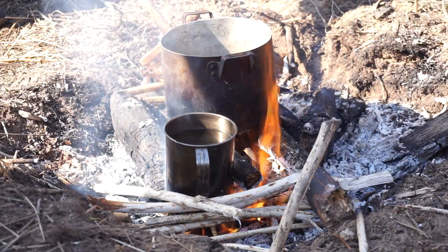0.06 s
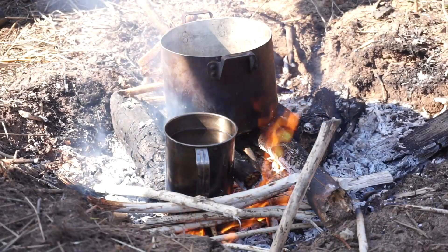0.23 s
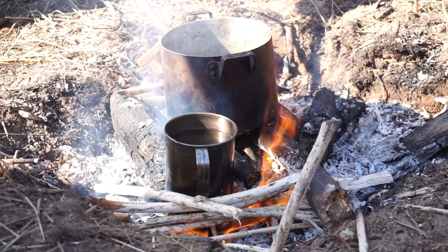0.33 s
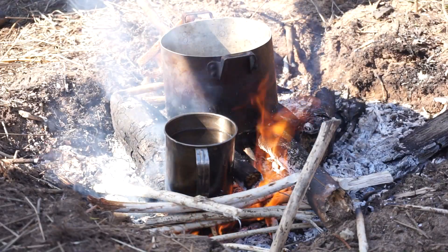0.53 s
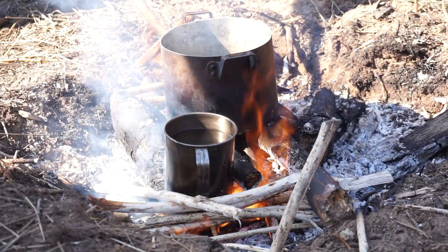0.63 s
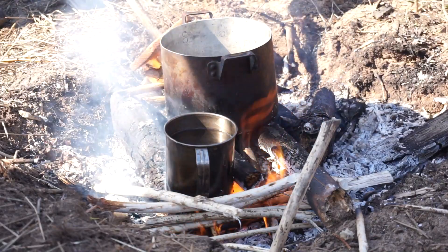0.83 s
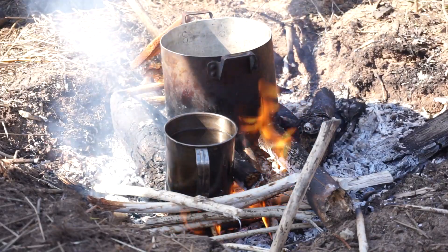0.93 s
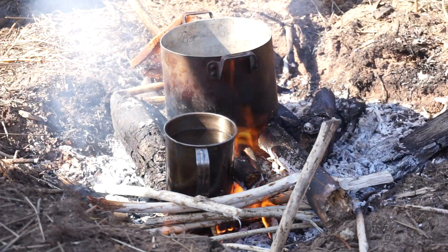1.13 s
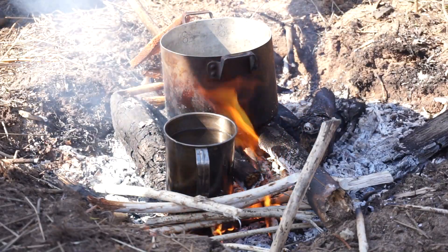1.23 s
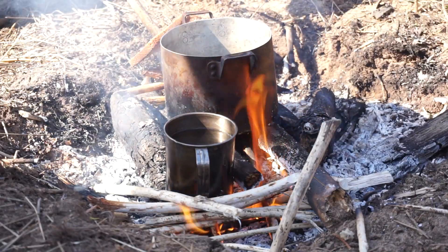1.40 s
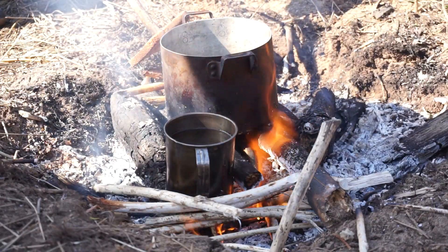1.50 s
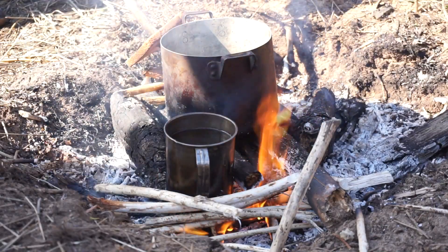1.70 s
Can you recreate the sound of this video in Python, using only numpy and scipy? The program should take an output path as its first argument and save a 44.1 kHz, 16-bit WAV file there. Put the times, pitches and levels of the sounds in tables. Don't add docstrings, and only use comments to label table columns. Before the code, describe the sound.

A wood fire snaps and crackles at arm's length, with hissing sap and faint distant water

```python
import sys
import numpy as np
from scipy import signal
from scipy.io import wavfile
from scipy.ndimage import uniform_filter1d

SR = 44100
rng = np.random.default_rng(int(sys.argv[2]) if len(sys.argv) > 2 else 0)


def convert_level_to_amplitude(level_db):
    exponent = np.asarray(level_db, float) / 20
    return 10 ** exponent


def pcm_store(signal):
    levels = np.round(np.clip(np.atleast_2d(signal), -1, 1) * 32767)
    wavfile.write(sys.argv[1], SR, levels.astype(np.int16).T)


N = 77175


def band(x, hz, width_hz):
    return signal.lfilter(*signal.iirpeak(min(hz, 0.45 * SR), hz / width_hz, fs=SR), x)


def unit(x):
    return x / np.sqrt(np.mean(x ** 2))


def walk(rate):
    hold = int(SR / rate)
    steps = np.repeat(rng.standard_normal(N // hold + 1), hold)
    smooth = uniform_filter1d(uniform_filter1d(steps, hold), hold)
    return 1.37 * smooth[:N]


def on_log(table, hz):
    table_hz, table_db = np.array(table).T
    return np.interp(np.log(hz), np.log(table_hz), table_db)


def pan(db):
    return convert_level_to_amplitude(np.array([[db / 2], [-db / 2]]))


def add(out, x, s):
    i = int(s * SR)
    out[:, i:i + x.shape[1]] += x[:, :N - i]


# frequency in Hz, side minus mid in dB.
STEREO_SPREAD = [(60, -3), (110, -13), (200, -8.5), (380, -1), (700, -0.5), (1290, 5), (2380, 1.5),
                 (4400, 0.5), (8120, -1), (15000, -7)]


def wide(hz, width_hz):
    noise = rng.standard_normal((2, N))
    mid, side = band(band(noise, hz, width_hz), hz, 1.62 * width_hz)
    return unit(mid) + convert_level_to_amplitude(on_log(STEREO_SPREAD, hz)) * unit(side) * np.array([[1], [-1]])


# frequency in Hz, level in dB per Hz.
RIVER_COLOUR = [(25, -22), (60, -16.5), (130, -10.5), (400, -8.5), (700, -6.5), (1130, -10), (2000, -8.5),
                (14000, -10)]


def river():
    out = 0
    for hz in 28 * 2 ** np.arange(0, 9.3, 1 / 3):
        flicker_db = 4.5 if hz < 250 else 1.2
        band_db = on_log(RIVER_COLOUR, hz) + 10 * np.log10(hz)
        out = out + convert_level_to_amplitude(band_db + flicker_db * walk(9.03)) * wide(hz, hz / 3)
    return convert_level_to_amplitude(-56.5) * unit(out)


# pitch in Hz, width in Hz, level in dB.
AIR_RESONANCES = [(628, 65, -72), (706.5, 41, -79), (180, 51, -82.5)]


def pot():
    out = 0
    for hz, width_hz, db in AIR_RESONANCES:
        out = out + convert_level_to_amplitude(db + 1.55 * walk(7.52)) * wide(hz, width_hz)
    return out


# start in seconds, level in dB, pitch in Hz.
FLAME_PUFFS = [
    (0.131, -62.5, 108),
    (0.242, -60.5, 95),
    (0.318, -58.5, 110),
    (0.724, -59.5, 177),
    (.87, -55, 180),
    (1.24, -62.5, 174),
    (1.332, -60.5, 88),
    (1.42, -61.5, 89),
]


def flame():
    rise_s, cycles = 0.0076, 1.75
    out = np.zeros((2, N))
    t = np.arange(8192) / SR
    for s, db, hz in FLAME_PUFFS:
        shape = (1 - np.exp(-t / rise_s)) * np.exp(-t * hz / cycles)
        swing = np.sin(2 * np.pi * hz * t * (1 - 1.18 * t))
        add(out, convert_level_to_amplitude(db + 3.5) * pan(0) * shape * swing, s - rise_s)
    return out


# time in seconds, pitch in Hz, level in dB.
STEAM_JETS = [
    [(.2, 2158, -83), (.225, 2174, -65.5), (.285, 2073, -68), (.34, 2174, -66), (.40, 2190, -69),
     (.48, 2223, -68.5), (.53, 2200, -67)],
    [(.93, 1930, -91), (.96, 1918, -66), (1.03, 1923, -72.5), (1.085, 1928, -60), (1.11, 1930, -93),
     (1.15, 1932, -62.5), (1.22, 1840, -73), (1.45, 1964, -82), (1.5, 1940, -106)],
]


def whistles(t):
    pitch_wobble, left_lag_s = 0.0039, 0.00021
    out = 0
    for jet in STEAM_JETS:
        s, hz, db = np.array(jet).T
        pitch = np.interp(t, s, hz) * (1 + pitch_wobble * walk(58.9))
        phase = 2 * np.pi * np.cumsum(pitch) / SR
        level_db = np.interp(t, s, db, left=-140, right=-140) + 4.5 + 3.6 * walk(39.1)
        out = out + np.sin(phase) * convert_level_to_amplitude(level_db)
    return np.array([np.roll(out, int(left_lag_s * SR)), out]) * pan(-12.5)


# time in seconds, level in dB.
SAP_LEVEL = [
    (0.0, -64),
    (0.292, -57.5),
    (0.52, -56),
    (0.988, -63),
    (1.272, -67),
    (1.462, -58),
    (1.75, -56.5),
]
# centre in Hz, width in Hz, level in dB.
SAP_BANDS = [(4700, 2200, -9), (8520, 4100, -3.5), (11540, 4900, 4.5), (14000, 1760, -3.5)]


def sizzle(t):
    bursts_per_s, size_spread_db = 2500, 2.5
    strikes = rng.random((3, N)) < bursts_per_s / SR
    size = convert_level_to_amplitude(size_spread_db * rng.exponential(size=(3, N)))
    grains = strikes * rng.standard_normal((3, N)) * size
    grains = grains[0] + 1.5 * grains[1:]
    patch_db = 1.1 * walk(24.93)
    out = 0
    for hz, width_hz, db in SAP_BANDS:
        coloured = band(band(grains, hz, width_hz), hz, 2 * width_hz)
        out = out + convert_level_to_amplitude(db + patch_db + 4.9 * walk(59.66)) * coloured
    level_db = np.interp(t, *np.array(SAP_LEVEL).T) + 2
    return unit(out) * convert_level_to_amplitude(level_db) * pan(2.5)


# start in seconds, level in dB, pitch in Hz, left-right in dB.
TWIG_KNOCKS = [
    (0.029, -46, 725, 12),
    (.391, -50, 400, -2),
    (.437, -46, 1060, 11),
    (.990, -53.5, 1020, -5),
    (1.229, -43, 2200, 8),
]


def knocks():
    out = np.zeros((2, N))
    t = np.arange(1024) / SR
    for s, db, hz, pan_db in TWIG_KNOCKS:
        thud = np.sin(2 * np.pi * hz * t) * np.exp(-t * hz / 0.99)
        add(out, convert_level_to_amplitude(db) * pan(pan_db) * thud, s)
    return out


# pitch in Hz, width in Hz, level in dB.
WOOD_RESONANCES = [(613, 250, -4.5), (2080, 600, 0.5), (3290, 240, -0.5), (4610, 1900, -3),
                   (7650, 1500, -7.5)]
# delay in seconds, level in dB.
NEAR_ECHOES = [
    (.00045, -9.5),
    (.0015, -8),
    (.0033, -10),
]


def pop(hz, body_db):
    burst_s, crack_width_hz, spray_s = 0.00022, 4000, 0.0026
    t = np.arange(1024) / SR
    burst = rng.standard_normal(1024) * np.exp(-(t / burst_s) ** 2)
    crack = band(band(burst, hz, crack_width_hz), hz, 2 * crack_width_hz)
    body = 0
    for k, (wood_hz, width_hz, db) in enumerate(WOOD_RESONANCES):
        body = body + (-1) ** k * convert_level_to_amplitude(db) * band(burst, wood_hz, width_hz)
    direct = crack / abs(crack).max() + convert_level_to_amplitude(body_db + 4) * body / abs(body).max()

    out = np.array([direct, direct])
    for delay_s, db in NEAR_ECHOES:
        for ear in range(2):
            level_chance, delay_chance = rng.standard_normal(2)
            delay = int(delay_s * SR * (1 + 0.14 * delay_chance))
            out[ear] += convert_level_to_amplitude(db + 1.85 * level_chance) * np.roll(direct, delay)

    noise = rng.standard_normal((2, 1024))
    fade = np.exp(-t / spray_s)
    bright_spray = unit(band(noise, 12470, 8600)) * fade
    woody_spray = convert_level_to_amplitude(body_db + 8) * band(noise * fade, 3200, 6500)
    return out + convert_level_to_amplitude(-15.5) * (bright_spray + woody_spray)


# start in seconds, crack level in dB, crack pitch in Hz, left-right in dB.
BARK_TICKS = [(0.3827, -33, 13000.0, 13), (0.4896, -41, 12100, 16), (0.508, -37, 11400.0, 10),
              (0.5319, -52, 13200.0, 3), (0.6253, -42, 14400.0, 5), (0.6822, -44, 12700.0, 7),
              (0.733, -40, 14600, 3), (0.7374, -46, 13200.0, -6), (0.884, -39, 13700.0, -2),
              (0.9104, -45, 12700.0, 0), (0.9147, -48, 11200, 2), (1.0243, -38.5, 14300.0, -4),
              (1.201, -46, 14300.0, 10), (1.2237, -41, 12900, -8), (1.23, -39, 13000, 0),
              (1.2328, -46, 12300.0, 0), (1.2399, -48, 13000.0, -8), (1.3321, -48, 12400.0, -4),
              (1.4368, -45.5, 12500, 1), (1.5027, -43, 13700, 0), (1.664, -49, 11200.0, -1),
              (1.68, -52, 13000.0, -5)]


def ticks():
    out = np.zeros((2, N))
    for s, db, hz, pan_db in BARK_TICKS:
        add(out, convert_level_to_amplitude(db + 2) * pan(pan_db) * pop(hz, body_db=-18), s)
    return out


# start in seconds, crack level in dB, crack pitch in Hz,
# wood body in dB against the crack, left-right in dB.
WOOD_POPS = [(0.0362, -32, 10500, -17, -4), (0.2055, -22, 15200, -7.5, -1), (0.3634, -16, 13260, -20, 0),
             (0.3898, -24.5, 12400.0, -9.5, -3.5), (0.3917, -26, 13400.0, -16, 7),
             (0.3972, -46.5, 12100.0, -24.5, 18), (0.4037, -43, 11700.0, -8, 22),
             (0.5182, -7.5, 14000.0, -22.5, 1.5), (0.5242, -33, 10800, -6.5, 9),
             (0.546, -48, 14600.0, -21, 7), (0.5997, -43, 11000.0, -9, 9), (0.6293, -27, 14700.0, -17, 8),
             (0.6531, -41, 14500.0, -25, 4), (0.7918, -32.5, 11100.0, -20.5, -1),
             (0.8248, -35, 12900.0, -27, 0), (0.829, -37.5, 12600, -28, -3), (1.083, -32, 13000, -23, 0),
             (1.237, -36, 10900, -32, 3), (1.3282, -25.5, 13900, -43, -5.5),
             (1.5682, -34, 12200.0, -27, 5.5)]


def pops():
    out = np.zeros((2, N))
    for s, db, hz, body_db, pan_db in WOOD_POPS:
        add(out, convert_level_to_amplitude(db + 2) * pan(pan_db) * pop(hz, body_db), s)
    return out


def scene():
    t = np.arange(N) / SR
    background = river() + pot()
    fire = flame() + whistles(t) + sizzle(t)
    return background + fire + knocks() + ticks() + pops()


def roll_off(x):
    return signal.sosfilt(signal.butter(12, 17490, fs=SR, output="sos"), x)


def record(dry):
    top_cut = signal.cheby1(10, 0.3, 15830, fs=SR, output="sos")
    mix = signal.sosfilt(top_cut, dry)
    return roll_off(mix)


dry = scene()
out = record(dry)
pcm_store(out)
```